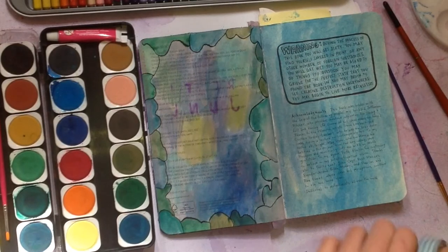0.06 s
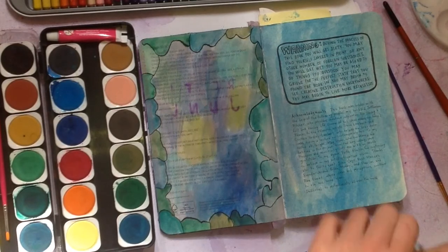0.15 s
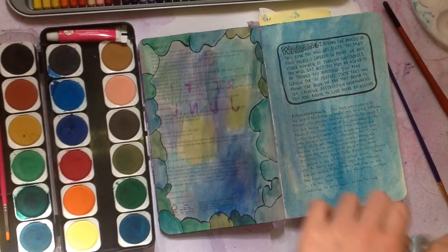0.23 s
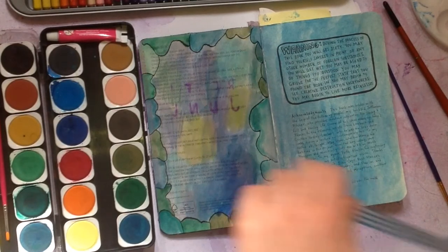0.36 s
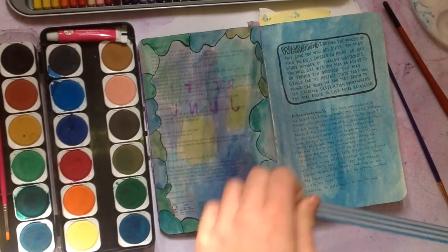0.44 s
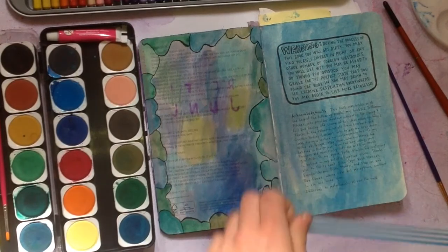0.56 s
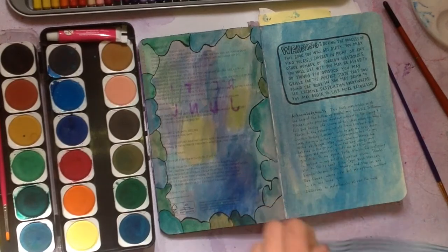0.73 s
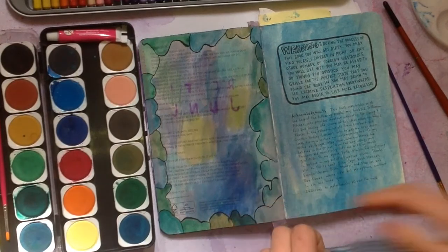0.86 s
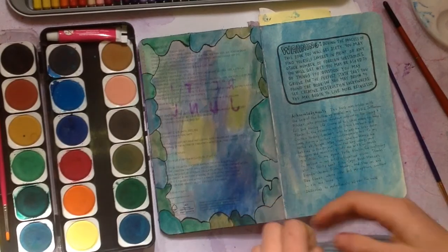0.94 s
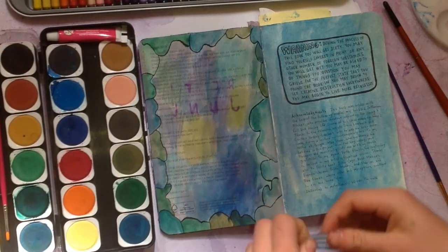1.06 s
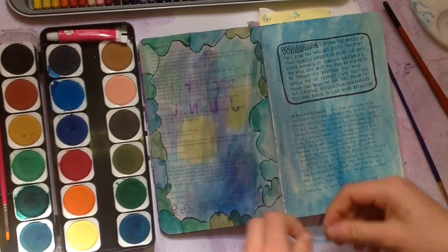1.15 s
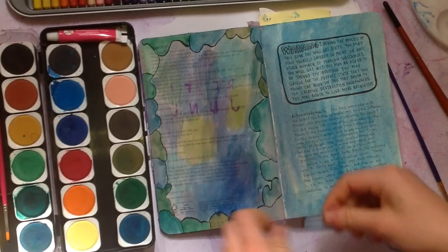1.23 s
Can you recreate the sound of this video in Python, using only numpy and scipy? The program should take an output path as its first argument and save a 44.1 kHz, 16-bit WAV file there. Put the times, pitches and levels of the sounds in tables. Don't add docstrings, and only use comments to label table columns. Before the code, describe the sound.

Close up in a quiet small room, sticky tape gives a few tiny tugs, tears loose in one bright rasp that swells and stops abruptly, then a cardboard roll taps and scuffs the desk, with two last snaps.

```python
import sys
import numpy as np
from scipy import signal
from scipy.fft import rfft, irfft
from scipy.io import wavfile
from scipy.ndimage import uniform_filter1d

SR = 44100
rng = np.random.default_rng(int(sys.argv[2]) if len(sys.argv) > 2 else 0)


def boost_factor(decibels):
    exponent = np.asarray(decibels, float) / 20
    return 10 ** exponent


def persist_wave(psi):
    counts = np.round(np.clip(psi, -1, 1) * 32767).astype(np.int16)
    wavfile.write(sys.argv[1], SR, np.atleast_2d(counts).T)


N = 57330
T = np.arange(N) / SR

# (time [s], effort [dB])
PULL = [
    (0.2062, -31.5),
    (0.241, -31.5),
    (0.306, -24.5),
    (0.342, -26.5),
    (0.393, -22),
    (0.426, -20.5),
    (0.444, -25),
    (0.458, -36),
    (0.462, -32),
]


def rip():
    # (frequency [Hz], level [dB])
    slack_colour = [(88, -51), (150, -29.5), (328, -13.5), (1530, -12.5), (3840, -2), (5150, -5),
                    (11700, 2), (15100, -2), (16000, -54)]
    taut_colour = [(88, -71), (150, -55), (1500, -17.5), (1900, -26), (3220, -15), (5360, -17), (9440, -2),
                   (14800, -8), (16000, -18)]
    slack_db, taut_db, release_db_per_s = -28, -21.5, -700
    s, db = np.transpose(PULL)
    effort_db = np.interp(T, s, db)
    taut = np.clip((effort_db - slack_db) / (taut_db - slack_db), 0, 1)
    on = uniform_filter1d(1. * (T > s[0]), size=12)
    on = on * boost_factor(release_db_per_s * np.maximum(T - s[-1], 0))
    slack_rasp = np.sqrt(1 - taut) * colour(slips(), slack_colour)
    taut_rasp = np.sqrt(taut) * colour(slips(1), taut_colour)
    return on * boost_factor(effort_db) * (slack_rasp + taut_rasp)


def slips(taut=0, clump_db=1.7, web_mix=1.6):
    # (frequency [Hz], width [Hz], slack level [dB], taut level [dB])
    web_rings = [(2362, 57, -1, 9.5), (3250, 74, -3.5, 2.5), (4000, 75, -5, 5), (4990, 610, -11, -1.5),
                 (6300, 300, 4.5, 5.5), (7900, 630, -2, -5), (9250, 450, -9, -2.5), (11870, 670, -2, -13),
                 (15740, 390, 9, 6.5)]
    slips_per_s, spread_db, clump_s, patch_db, pitch_drift = 8000, 2.4, .0012, 1.8, 0.048
    size_db = spread_db * np.minimum(rng.exponential(1, N), 4) + clump_db * wander(clump_s)
    breaks = rng.random(N) < slips_per_s / SR
    clicks = evened(boost_factor(size_db) * breaks * rng.choice([-1., 1.], N))
    web = np.zeros(N)
    for hz, width_hz, *db in web_rings:
        patch = clicks * boost_factor(patch_db * wander(2 * clump_s))
        web += boost_factor(db[taut]) * resonate(patch, hz * (1 + pitch_drift * wander(0.11)), width_hz)
    return clicks + web_mix * evened(web)


def threads():
    # (time [s], peak [dB])
    breaks = [(0.2067, -22.0), (0.2077, -22.0), (0.2087, -22.0), (0.2187, -21.0), (0.2205, -20.0),
              (0.239, -20.0), (0.253, -19.0), (0.2559, -19.0), (0.268, -18.0), (0.2792, -16.0),
              (0.2874, -17.0), (0.2985, -17.0), (0.3046, -15.0), (0.3124, -13.0), (0.323, -15.0),
              (0.3269, -16.0), (0.3352, -16.0), (0.3362, -17.0), (0.3583, -17.0), (0.3732, -14.0),
              (0.379, -15.0), (0.3827, -15.0), (0.3895, -13.0), (0.3938, -13.0), (0.3964, -13.0),
              (0.3995, -12.0), (0.4005, -12.0), (0.4017, -13.0), (0.4187, -9.0), (0.4206, -10.0),
              (0.4413, -12.0), (0.443, -10.0), (0.452, -15.0), (0.4588, -12.0)]
    middle_hz, spread, t60 = 10200, .2, .0014
    out, t = np.zeros(N), T[:200]
    for (s, db), (pitch, side) in zip(breaks, rng.uniform(-1, 1, (len(breaks), 2))):
        hz = middle_hz * (1 + spread * pitch)
        shape = boost_factor(db + 3.0 - 60 * t / t60) * np.minimum(t * hz, 1)
        add(out, s - 1 / hz, np.sign(side) * shape * np.sin(2 * np.pi * hz * t))
    return out


def lurches():
    # (time [s], length [s], level [dB], ring [Hz])
    rows = [(0.2049, 0.01, -35, 11400), (0.2056, 0.009, -36.5, 5100), (0.203, 0.0079, -36, 6540),
            (0.2141, 0.039, -31.5, 11600), (0.215, 0.0091, -32, 5730), (0.2257, 0.0087, -33.5, 11500),
            (0.2324, 0.012, -39, 3960), (0.2498, 0.0064, -26, 12050), (0.25, 0.012, -44, 4060),
            (0.263, 0.0136, -42.0, 4190), (0.2751, 0.0069, -38, 11500), (0.283, 0.014, -29, 7900),
            (0.296, 0.025, -38.5, 2990), (0.302, 0.0166, -40, 8000), (0.3023, 0.027, -34, 11100),
            (0.3027, 0.015, -39, 3780), (0.3081, 0.022, -42, 13600), (0.3335, 0.01, -33, 8200),
            (0.339, 0.14, -33, 9700), (0.3673, 0.013, -42, 9100), (0.3685, 0.022, -32.5, 6200),
            (0.384, 0.016, -34.5, 3380), (0.3876, 0.011, -34, 9600), (0.393, 0.0086, -32.0, 11500),
            (0.4164, 0.011, -23, 8100), (0.4204, 0.025, -30, 11800), (0.4226, 0.0074, -40.0, 3780),
            (0.4372, 0.0074, -22, 12050), (0.4399, 0.013, -22, 8900), (0.446, 0.013, -26, 12700)]
    width = 0.16
    return (T > PULL[0][0]) * swells([(*row, width * row[3]) for row in rows])


def sings():
    # (time [s], length [s], level [dB], ring [Hz], width [Hz])
    rows = [(.030, .014, -53, 9400, 360), (.0435, 0.0027, -51, 5800, 390), (0.037, 0.0035, -49, 5800, 590),
            (.063, 0.01, -45, 2760, 220), (.067, 0.0071, -42, 5100, 160),
            (0.0675, 0.0083, -41.5, 8000, 460), (0.1, 0.004, -40, 3820, 200),
            (.2064, 0.02, -41.5, 3730, 540), (0.0023, 0.0036, -50, 3770, 380),
            (.0245, .004, -45.5, 2830, 350), (.0675, 0.0046, -45, 4320, 310),
            (.066, 0.0044, -43, 19000, 600), (0.075, 0.007, -47, 10200, 550), (.151, .008, -56, 7200, 1200),
            (0.21, .004, -52, 2000, 2200), (.229, 0.021, -52.5, 997, 110), (.382, 0.0375, -49, 1596, 100),
            (1.1305, 0.0022, -48, 10200, 1200), (1.1305, .0025, -57, 720, 800),
            (1.1895, 0.0039, -41.5, 1050, 720), (1.189, .004, -51, 14000, 700),
            (0.94, 0.011, -55, 2100, 360), (.425, 0.085, -57.5, 3300, 24),
            (.4575, 0.0017, -18.5, 10000, 2800)]
    return swells(rows)


def tugs():
    # (time [s], peak [dB], rise [s], t60 [s], body level [dB])
    first_tugs = [
        (.0018, -35, 0.00087, 0.0097, 1),
        (.0238, -38, 0.0018, 0.027, -6),
        (.063, -36, 0.0062, 0.014, -13),
        (.0910, -31.5, 0.00042, 0.023, -10.5),
    ]
    # (time [s], peak [dB], rise [s], t60 [s], body level [dB])
    later_tugs = [
        (.612, -54.5, 0.0075, 0.28, -11),
        (.7195, -47.5, 0.00057, 0.015, -2.5),
        (1.090, -63.5, 0.0034, 0.064, 4),
        (1.1305, -41.5, 0.00072, 0.0086, -11),
        (1.1865, -39.5, 0.004, 0.013, -0.5),
    ]
    # (frequency [Hz], width [Hz], level [dB])
    strip_rings = [(2600, 200, -3), (3790, 110, 4), (5200, 380, -12), (8100, 610, 3), (11900, 1100, 4.5)]
    hollow_rings = [(1210, 300, -33), (1500, 380, -12), (4070, 500, -3), (6580, 290, 0), (2500, 270, -6.5)]
    # (frequency [Hz], level [dB])
    glue_colour = [(180, -40), (300, -5), (1840, -9), (3700, -8), (5340, -7.5), (12100, 0), (16000, -2)]
    scuff_colour = [(400, -4.5), (1100, -8), (2100, 1.5), (3200, -9.5), (7000, -12), (15000, -23)]
    # (time [s], level [dB])
    creep = [(0, -63), (.02, -49.5), (.045, -52.5), (.065, -43), (.1, -65), (.13, -57), (0.201, -68)]
    scuff = [(.65, -91), (.66, -71), (.68, -61), (.695, -49), (.722, -65), (.735, -90), (.76, -99),
             (.80, -60), (.88, -62.5), (.95, -72)]
    glue = colour(slips(0, 0, .6), glue_colour)
    torn = tears(first_tugs, strip_rings, glue) + tears(later_tugs, hollow_rings, glue)
    scuffing = under(scuff, colour(slips(0, 2.5, 0), scuff_colour))
    return torn + under(creep, glue[::-1]) + scuffing


def tears(rows, rings, glue):
    body = np.zeros(N)
    for hz, width_hz, db in rings:
        once = resonate(rng.standard_normal(N), hz, width_hz)
        body += boost_factor(db) * resonate(once, hz, 2 * width_hz)
    body = evened(body)
    out, t = np.zeros(N), T[:4000]
    for s, db, rise, t60, body_db in rows:
        shape = np.where(t < rise, (t / rise) ** 2, boost_factor(-60 * (t - rise) / t60))
        k = min(round(s * SR), N - len(t))
        add(out, s, boost_factor(db) * shape * (glue + boost_factor(body_db) * body)[k:k + len(t)])
    return out


def taps():
    # (time [s], strength [dB], crack [dB], desk thud [dB], brightest ring [Hz])
    knocks = [(0.5303, -45.5, -3.5, -37, 2840), (0.6525, -41.5, -2, -13, 2570),
              (.6830, -35, -3, -7.5, 1740), (0.6847, -38, -6, -39, 2050), (.7050, -54.5, 2, 0, 2150),
              (.7155, -57, 7, -30, 1500), (.7878, -38.5, -5.5, -28, 1980), (0.799, -73, -14, -20, 2100),
              (0.8305, -46, -9, -47, 2290), (0.854, -55, -5, -14, 1980), (.8760, -53.5, -7, -12, 2900),
              (0.884, -57, -2, -8, 2030), (0.9168, -57.5, 0.5, -2.5, 1820)]
    # (frequency [Hz], level [dB], t60 [s])
    roll_rings = [(672, 14.5, 0.07), (1070, 17, 0.017), (1500, -41, 0.012), (1820, 6.5, 0.011),
                  (2360, 7, 0.0085), (2800, 5, 0.0069), (3300, -38, 0.0089), (4270, -3, 0.016)]
    # (frequency [Hz], level [dB])
    crack_colour = [(500, -39), (3000, 2), (9500, 0.5), (12000, -6), (16000, -20)]
    desk_hz, desk_t60, crack_t60, rattle_t60 = 185, 0.039, 0.024, 0.03
    focus_db_per_oct, roll_low_hz = -22, 600
    roll_filter = signal.butter(2, roll_low_hz, "high", fs=SR)
    out, t = np.zeros(N), T[:5000]
    noises = rng.standard_normal((len(knocks), 5000))
    for (s, db, crack_db, desk_db, top_hz), noise in zip(knocks, noises):
        blow = 0.048 * noise * boost_factor(-60 * t / rattle_t60)
        blow[0] = -1
        rings = np.zeros(len(t))
        for hz, ring_db, t60 in roll_rings:
            focus_db = focus_db_per_oct * abs(np.log2(hz / top_hz))
            rings += boost_factor(ring_db + focus_db - 60 * t / t60) * np.sin(2 * np.pi * hz * t)
        roll = signal.lfilter(*roll_filter, signal.fftconvolve(blow, rings)[:len(t)])
        crack = colour(noise[::-1], crack_colour) * boost_factor(crack_db - 60 * t / crack_t60)
        thud = boost_factor(desk_db - 60 * t / desk_t60) * np.sin(2 * np.pi * desk_hz * t)
        thud = thud * np.minimum(t / 0.0028, 1)
        add(out, s, boost_factor(db) * (roll + crack + 3 * thud))
    return out


def rubbing():
    # (time [s], length [s], level [dB], ring [Hz], width [Hz])
    rows = [(-.04, 0.11, -57, 212.5, 57), (.05, 0.2, -66, 340, 140), (.212, 0.05, -50.5, 438, 190),
            (.228, 0.06, -51, 332, 70), (.30, 0.33, -66.5, 380, 440), (0.573, 0.15, -64, 189, 74),
            (.685, 0.047, -56, 320, 270), (.73, 0.11, -70, 172, 19), (0.824, 0.098, -63, 296.3, 11.7),
            (0.877, 0.061, -65, 212, 220), (1.018, 0.027, -67, 284, 240), (1.135, 0.15, -67, 180, 32),
            (1.146, 0.097, -66.5, 323, 27)]
    return swells(rows)


def room(x):
    # (frequency [Hz], t60 [s])
    decay = [(300, 0.26), (2000, 0.24), (8000, 0.19), (15000, 0.092)]
    echoes = np.zeros(SR // 2)
    at = np.arange(120, len(echoes) - 20, 20)
    echoes[at + rng.integers(0, 20, len(at))] = rng.choice([-1., 1.], len(at))
    hz, t, z = signal.stft(echoes, SR, nperseg=128)
    fade = boost_factor(-60 * t / read(decay, hz)[:, None])
    tail = signal.istft(z * fade, SR, nperseg=128)[1]
    return signal.fftconvolve(x, tail / np.linalg.norm(tail))[:N]


def room_air():
    # (frequency [Hz], level [dB])
    air_colour = [(15, -73), (25, -33), (223, -8), (659, -13), (734, -16), (911, -8), (1890, -18),
                  (12200, -18.5), (16000, -22)]
    level_db = -61 + .5 * wander(0.012)
    return boost_factor(level_db) * colour(rng.standard_normal(N), air_colour)


def swells(rows):
    evenness = .45
    out = np.zeros(N)
    for (s, length, db, hz, width_hz), noise in zip(rows, rng.standard_normal((len(rows), 20000))):
        ring = resonate(resonate(noise, hz, width_hz), hz, width_hz)
        ring = ring / (abs(signal.hilbert(ring)) + .5 * ring.std()) ** evenness
        t = T[:min(round(length * SR), 15000)]
        sound = np.sin(np.pi * t / length) * boost_factor(db) * evened(ring)[-len(t):]
        add(out, max(s, 0), sound[max(round(-s * SR), 0):])
    return out


def under(curve, sound):
    s, db = np.transpose(curve)
    return boost_factor(np.interp(T, s, db, left=-120, right=-120)) * sound


def resonate(x, hz, width_hz):
    turn = np.exp(2j * np.pi * np.cumsum(hz * np.ones(len(x))) / SR)
    r = np.exp(-np.pi * width_hz / SR)
    return 2 * (turn * signal.lfilter([1 - r], [1, -r], x / turn)).real


def colour(x, points):
    gain = boost_factor(read(points, np.fft.rfftfreq(len(x), 1 / SR)))
    return evened(irfft(rfft(x) * gain, len(x)))


def read(points, hz):
    f, value = np.transpose(points)
    return np.interp(np.log(hz + 1), np.log(f + 1), value)


def wander(s):
    size = max(int(s * SR), 2)
    smooth = uniform_filter1d(rng.standard_normal(N), size)
    return evened(uniform_filter1d(smooth, size))


def evened(x):
    return x / np.sqrt(np.mean(x ** 2) + 1e-20)


def add(mix, s, sound):
    part = mix[round(s * SR):][:len(sound)]
    part += sound[:len(part)]


def scene():
    room_db, mic_low_hz = -13, 135
    near = rip() + threads() + lurches() + sings() + tugs() + taps()
    near = near + boost_factor(room_db) * room(near)
    near = signal.sosfilt(signal.butter(4, mic_low_hz, "high", fs=SR, output="sos"), near)
    return (near + rubbing() + room_air())[None]


def roll_off(x):
    return signal.sosfilt(signal.butter(12, 16460, fs=SR, output="sos"), x)


def record(dry):
    edge_hz = 15280
    low_pass = signal.firwin(201, edge_hz, window=("kaiser", 5), fs=SR)
    mix = signal.oaconvolve(dry, low_pass[None], "same")
    return roll_off(mix)


dry = scene()
out = record(dry)
persist_wave(out)
```